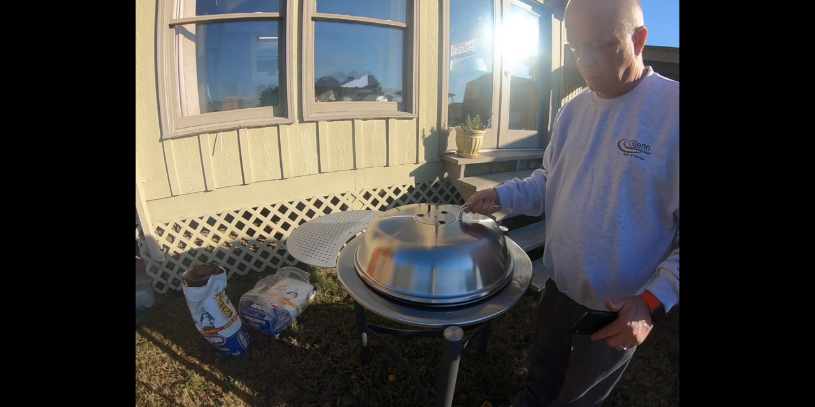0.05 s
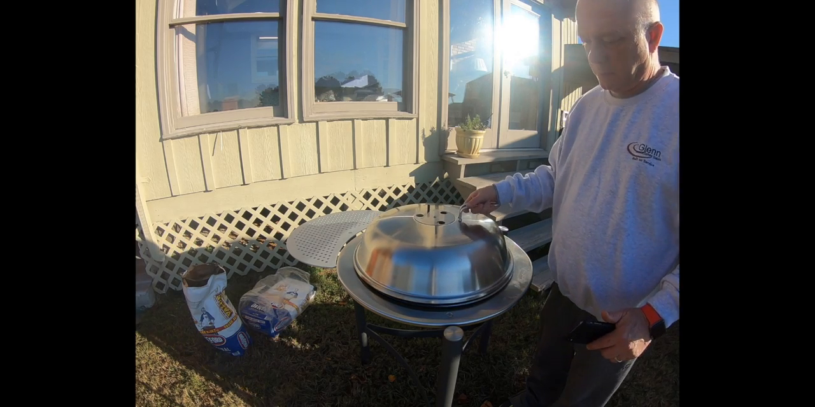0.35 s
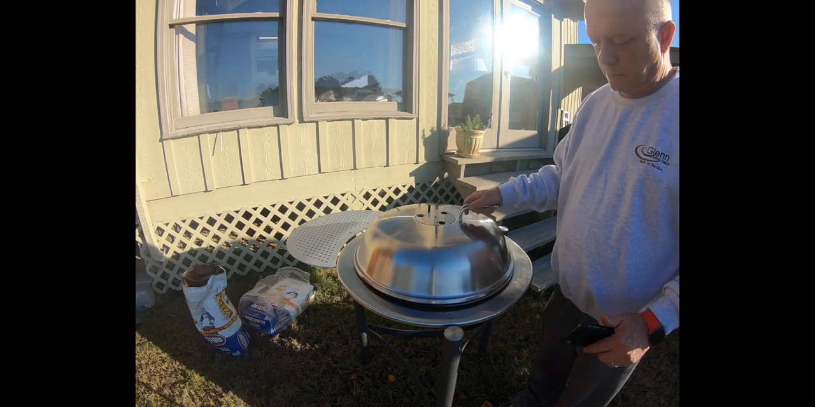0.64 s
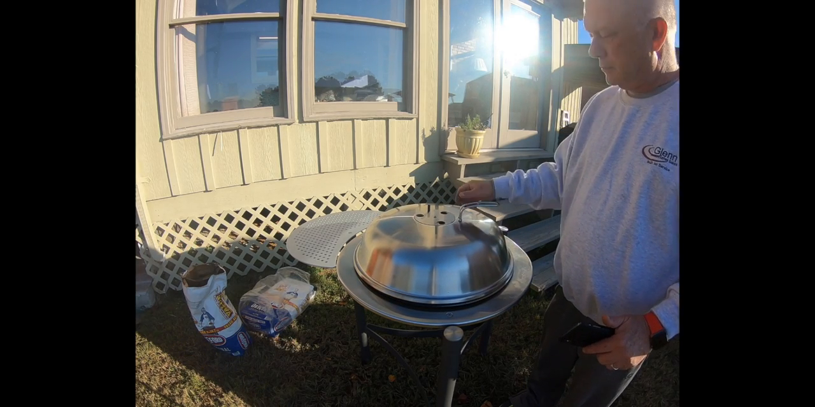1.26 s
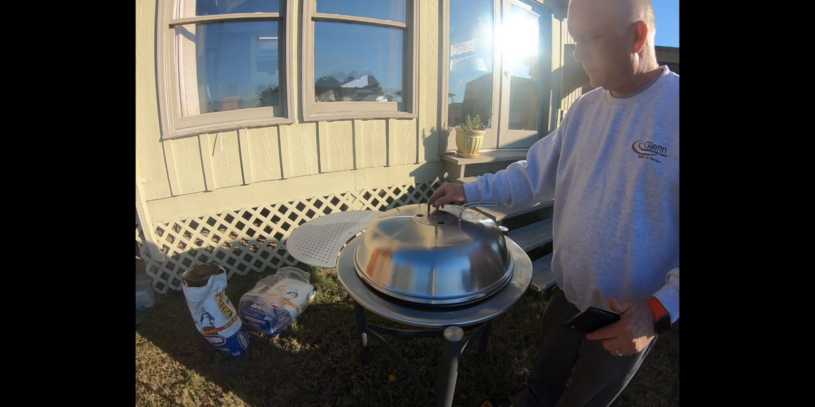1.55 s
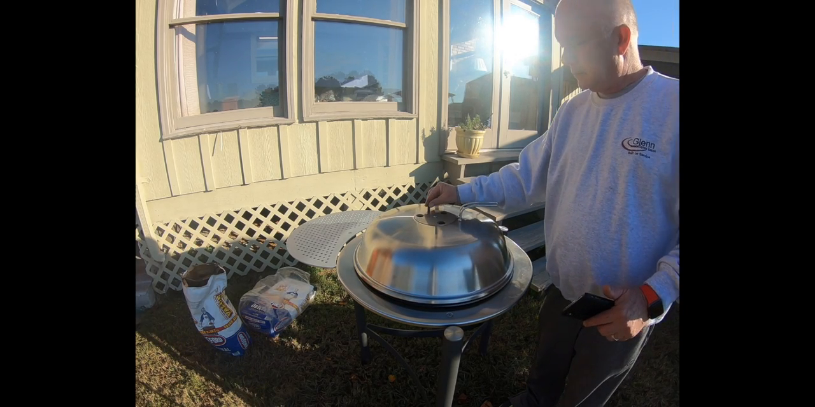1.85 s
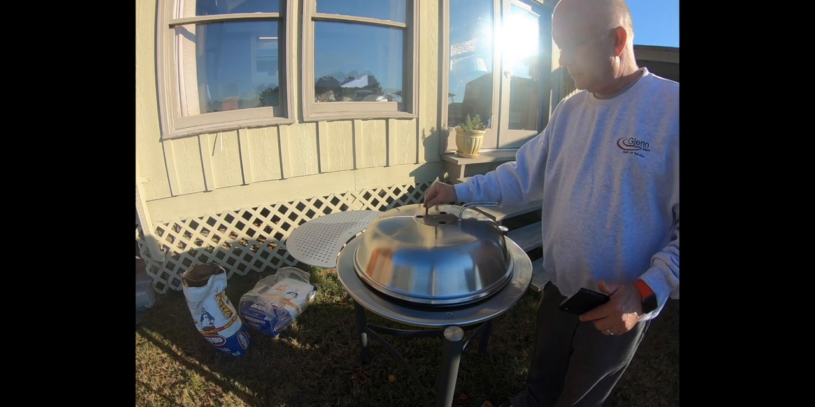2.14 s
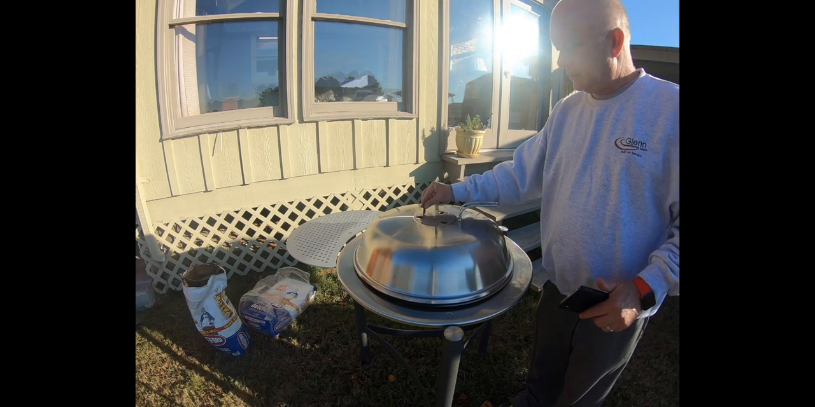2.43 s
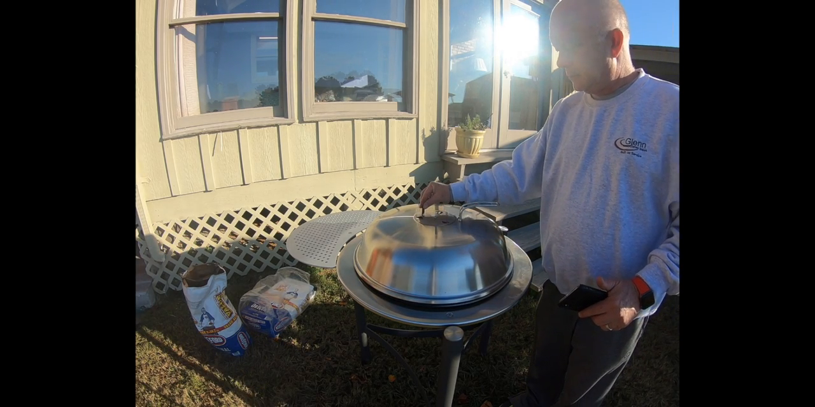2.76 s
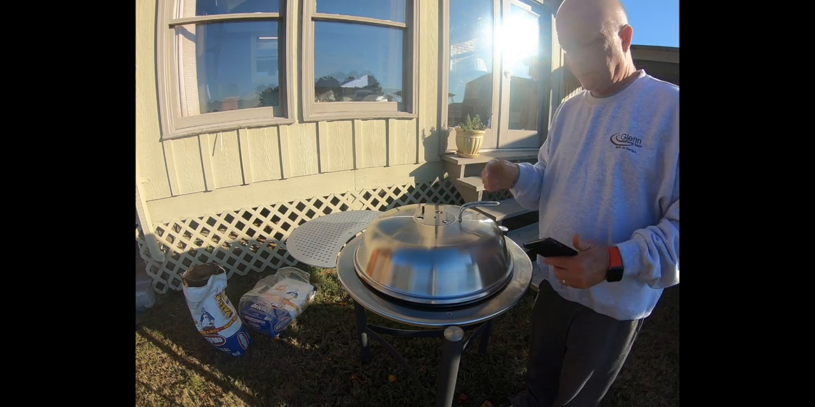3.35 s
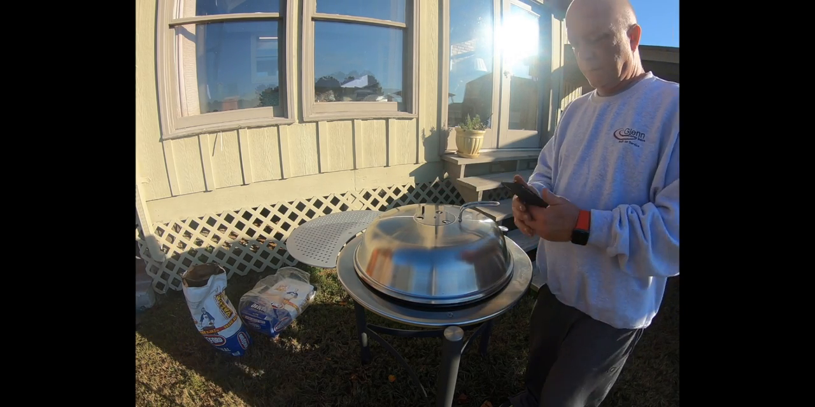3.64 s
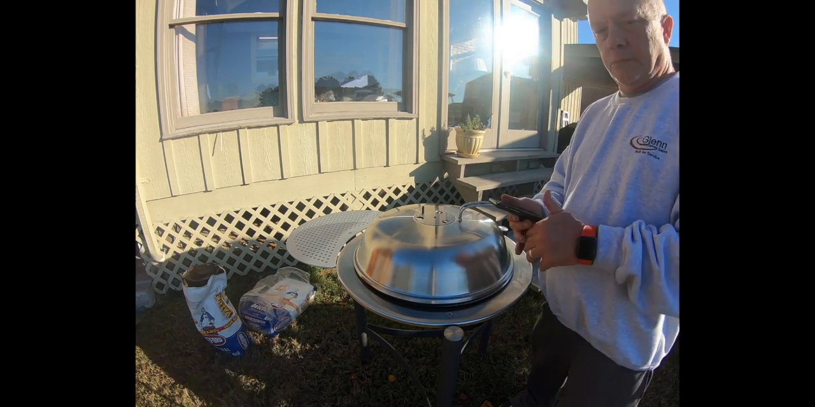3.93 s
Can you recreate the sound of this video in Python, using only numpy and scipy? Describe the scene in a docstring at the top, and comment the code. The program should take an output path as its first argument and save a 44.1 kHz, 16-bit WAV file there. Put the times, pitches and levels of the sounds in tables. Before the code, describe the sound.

Metal clacks and ticks from a grill lid, over low wind buffeting the microphone.

```python
"""Grill lid in a windy yard

A steel grill lid is handled: its fittings scrape, clack and tick, and the dome rings briefly.
A soft, hollow rub follows the last clack, then a sleeve swishes as the hand comes away, with a few
small clicks. The yard walls answer lid and hand. Wind buffets the microphone, harder after the
first second, with dull low bumps, over a faint outdoor hush."""
import sys
import numpy as np
from scipy import signal
from scipy.fft import rfft, irfft, next_fast_len
from scipy.io import wavfile
from scipy.ndimage import map_coordinates

SR = 44100
rng = np.random.default_rng(int(sys.argv[2]) if len(sys.argv) > 2 else 0)


def master_out(mix):
    """Clip the mix to full scale and print it as 16-bit PCM to the path in sys.argv[1]."""
    frames = np.transpose(np.atleast_2d(mix))
    ceiling = np.clip(frames, -1, 1)
    pcm = np.round(ceiling * 32767).astype(np.int16)
    wavfile.write(sys.argv[1], SR, pcm)


N = 176400
T = np.arange(N) / SR
LN_1000 = np.log(1000)  # a 60 dB decay


def amp(db):
    """Decibels to gain."""
    return 10 ** (np.asarray(db) / 20)


def unit(x):
    """Scale to rms 1."""
    return x / np.sqrt(np.mean(x ** 2) + 1e-20)


def along(points, hz):
    """Read a (freq_hz, value) curve on a log frequency axis."""
    freqs, values = np.transpose(points)
    return np.interp(np.log(hz + 1), np.log(freqs + 1), values)


def fader(points):
    """Gain per sample from (time_s, level_db) points."""
    return amp(np.interp(T, *np.transpose(points)))


def lowpass(x, cutoff_hz):
    """Roll off the highs at 24 dB an octave."""
    size = next_fast_len(N + SR // 2)
    hz = np.fft.rfftfreq(size, 1 / SR)
    return irfft(rfft(x, size) / (1 + (hz / cutoff_hz) ** 4), size)[:N]


def noise(*eqs):
    """Noise of rms 1 through stacked (freq_hz, gain_db) EQ curves."""
    hz = np.fft.rfftfreq(N, 1 / SR)
    response = amp(sum(along(eq, hz) for eq in eqs))
    return unit(irfft(rfft(rng.standard_normal(N)) * response, N))


def wobble(rate_hz):
    """A smooth curve through rate_hz random points a second."""
    return map_coordinates(rng.standard_normal(N // 8), [T * rate_hz], mode="wrap")


def strike(start_s, attack_s, t60_s):
    """Envelope of a hit: fast attack, exponential decay."""
    age = np.maximum(T - start_s, 0)
    return (1 - np.exp(-age / attack_s)) * np.exp(-np.minimum(LN_1000 * age / t60_s, 50))


# Hits on the lid: start_s, level_db, bass_db, presence_db, treble_db, attack_s, t60_s, ring_offset_db
LID_HITS = [(.018, -22, -23, -11, 3, 0.00033, 0.027, -35), (.053, -31.5, 14, 19, -6, 0.00073, 0.049, -23),
            (0.29, -35, 3, 1.5, -1, 0.00087, 0.096, -11), (.383, -20, 5.5, 0, 5.5, 0.00034, 0.13, -15.5),
            (0.393, -27, 6.5, 7, 1.5, .001, 0.21, -11.5), (.513, -45, -21, 8, 13, .002, .2, -12),
            (.648, -50, 13, -5, 11.5, 0.0025, 0.22, -17), (.775, -40, -2.5, -1.5, -10.5, .0015, 0.28, -13),
            (1.188, -36, -10.5, 4, -6, .002, 0.2, -8), (1.575, -47.5, -11, 7, -3.5, .001, 0.26, -9),
            (1.968, -51.5, -8, 0, 4, .001, 0.6, -1.5), (2.026, -19, -4, -8.5, -12.5, .001, 0.095, -13),
            (2.034, -23.5, -10, 2.5, 2.5, 0.00095, 0.17, -12)]
# EQ of the dense clatter: freq_hz, gain_db
CLATTER_EQ = [(80, -8.5), (200, 4), (450, -6.5), (700, -2), (1100, -4), (1800, -8), (3100, -7.5),
              (4800, -12.5), (6400, -12), (8500, -22), (13000, -24.5), (16000, -49.5)]
# Resonances of lid and bowl that colour the clatter: centre_hz, half_width_hz, gain_db
BODY_RESONANCES = [(233, 60, -2), (429, 7.3, 11.5), (588, 69, 6), (910, 49, 7), (1000, 30, 5.5),
                   (1217, 22, 11.5), (1550, 8.3, 5), (2260, 180, 2), (2950, 36, 1.5)]
# Ringing modes of the dome: pitch_hz, gain_db, t60_s
DOME_MODES = [(467, -7, .28), (571, -10, .22), (640, -9, .22), (803, -9, .3), (898, -6, .35),
              (1056, -6, .35), (1252, -5, .28), (1384, -10, .55), (1577, -9, .35), (2169, -15, .3),
              (2547, -11, .42), (3075, -14, .28), (3628, -10, .35), (5697, -14, .28)]


def lid_knocks(mode_spread_db=1.1):
    """Each knock on the steel is a short, dense clatter plus the ring of the dome's modes."""
    hz = np.geomspace(100, 4000, 400)
    peaks_db = sum(db / (1 + ((hz - centre) / width) ** 2) for centre, width, db in BODY_RESONANCES)
    body_eq = np.column_stack([hz, peaks_db])
    out = np.zeros(N + SR)
    age = np.arange(SR * 3 // 4) / SR
    for start_s, level_db, bass_db, presence_db, treble_db, attack_s, t60_s, ring_db in LID_HITS:
        hit_eq = [(300, bass_db), (1000, 0), (3000, presence_db), (9000, treble_db)]
        clatter = noise(CLATTER_EQ, body_eq, hit_eq)
        out[:N] += amp(level_db) * strike(start_s, attack_s, t60_s) * clatter
        ring = np.zeros(len(age))
        for pitch_hz, mode_db, mode_t60_s in DOME_MODES:
            decay = amp(mode_db + rng.normal(0, mode_spread_db)) * np.exp(-LN_1000 * age / mode_t60_s)
            ring += decay * np.sin(2 * np.pi * (pitch_hz * age + rng.random()))
        ring *= 1 - np.exp(-age / attack_s)
        out[round(start_s * SR):][:len(age)] += amp(level_db + ring_db) * ring
    return out[:N]


# Tick of the fittings: start_s, level_db, t60_s
FITTING_TICKS = [(2.004, -30, 0.15)]
# Its bright, peaky EQ: freq_hz, gain_db
TICK_EQ = [(500, -24), (1500, -3.5), (2600, -11), (3400, -13), (3650, 8), (3900, -11), (4600, -9),
           (5400, -8), (6100, -15), (6650, 3), (7500, -8.5), (8600, -20), (10000, -6.5), (11000, -9.5),
           (16000, -19)]


def fitting_tick(attack_s=0.00028):
    """A light first touch of metal just ahead of the last big clack."""
    return sum(amp(level_db) * strike(start_s, attack_s, t60_s) * noise(TICK_EQ)
               for start_s, level_db, t60_s in FITTING_TICKS)


# Slides of the fittings: start_s, length_s, level_db, bass_db
SCRAPE_STROKES = [(-.015, .072, -37, 3), (.298, .08, -40, -7)]
# EQ of sliding metal: freq_hz, gain_db
SCRAPE_EQ = [(100, -3), (330, 6.5), (600, 4), (1200, 0), (1900, -10), (3000, -5), (4500, -15),
             (6300, -14.5), (8500, -19.5), (15000, -22)]


def metal_scrapes(rough_db=3, attack_s=0.012, release_s=0.028):
    """Metal drags on metal with an uneven grip."""
    out = np.zeros(N)
    for start_s, length_s, level_db, bass_db in SCRAPE_STROKES:
        attack = np.clip((T - start_s) / attack_s, 0, 1)
        release = np.exp(-np.maximum(T - start_s - length_s, 0) / release_s)
        friction = noise(SCRAPE_EQ, [(300, bass_db), (800, 0)])
        grip = amp(rough_db * wobble(250))
        out += amp(level_db) * attack * release * unit(friction * grip)
    return out


# Swell of the rub after the last clack: time_s, level_db
RUB_FADER = [(2.08, -69), (2.17, -63), (2.23, -44.5), (2.31, -41.5), (2.38, -50.5), (2.5, -55), (2.65, -71)]
# Its hollow EQ: freq_hz, gain_db
RUB_EQ = [(300, -21), (520, -9), (640, 4.5), (800, 1.5), (930, -6), (1200, -2.5), (1500, -10.5),
          (1900, -23.5), (2500, -21.5), (4000, -37), (9000, -41.5)]


def lid_rub(rough_db=2):
    """A gentle slide sounds the lid's low resonances."""
    gate = (T > RUB_FADER[0][0]) & (T < RUB_FADER[-1][0])
    friction = noise(RUB_EQ) * amp(rough_db * wobble(65))
    return fader(RUB_FADER) * gate * unit(friction)


# Swell of the sleeve swish: time_s, relative_db
SLEEVE_FADER = [(3.46, -63.5), (3.54, -44.5), (3.6, -37), (3.645, -40), (3.7, -40.5), (3.73, -48),
                (3.81, -57), (3.87, -50.5), (4, -61.5)]
# Airy EQ of the cloth: freq_hz, gain_db
CLOTH_EQ = [(300, -22), (1100, -6.5), (2000, -14.5), (3200, -5), (4800, -8.5), (5800, -0.5), (6700, -0.5),
            (7700, -7.5), (11000, -10), (15500, -21)]


def sleeve_swish(grain_db=1.5, snag_db=3.15, gain_db=-3.5):
    """Grainy cloth friction swells, snags and fades."""
    gate = T > SLEEVE_FADER[0][0]
    grip = amp(grain_db * wobble(700) + snag_db * wobble(50))
    return amp(gain_db) * fader(SLEEVE_FADER) * gate * unit(noise(CLOTH_EQ) * grip)


# Small clicks in the hand: start_s, level_db, pitch_hz
HAND_CLICKS = [(3.619, -25, 6150), (3.639, -21.5, 6100), (3.6442, -19, 5650), (3.668, -31, 6500),
               (3.681, -28.5, 1200), (3.704, -31, 2360), (3.7895, -33, 4270), (3.842, -33, 6500)]


def hand_clicks(attack_s=0.00042, t60_s=0.0086, skirt_oct=0.52, skirt_db=-13):
    """Tiny dry clicks, each with one broad resonance."""
    out = np.zeros(N)
    ratio = 2 ** skirt_oct
    for start_s, level_db, pitch_hz in HAND_CLICKS:
        peak = [(pitch_hz / ratio, skirt_db), (pitch_hz, 0), (pitch_hz * ratio, skirt_db)]
        click_eq = [(150, -25), *peak, (16000, -30)]
        out += amp(level_db) * strike(start_s, attack_s, t60_s) * noise(click_eq)
    return out


def eddies(eq, evenness):
    """Low turbulence with its chance swells evened out: 0 leaves them, 1 nearly flattens them."""
    turbulence = noise(eq)
    power = np.abs(signal.hilbert(turbulence)) ** 2
    return unit(turbulence / (power + 0.3) ** (evenness / 2))


# Gusts of wind pressure and their faster eddies: time_s, relative_db
GUST_FADER = [(0, -21), (.2, -59), (.45, -29), (.53, -17), (.62, -30), (.75, -59), (.92, -25),
              (1.02, -21.5), (1.25, -9.5), (1.52, -15), (1.67, -6.5), (1.8, -20), (1.9, -21), (1.98, -10.5),
              (2.1, -12), (2.22, -8), (2.45, -16), (2.66, -14.5), (2.8, -25.5), (2.95, -12.5), (3.15, -19),
              (3.38, -23), (3.6, -11.5), (3.8, -15.5), (4, -19)]
FLUTTER_FADER = [(0.08, -40), (0.17, -63), (0.21, -40), (0.35, -57), (0.39, -38), (0.48, -53), (0.92, -55),
                 (1.08, -26.5), (1.41, -38.5), (1.47, -44), (1.72, -21), (1.75, -34.5), (1.99, -18),
                 (2.14, -25), (2.19, -16.5), (2.35, -28), (2.41, -51.5), (2.95, -52), (3.03, -72),
                 (3.22, -59), (3.47, -38), (3.56, -60), (3.7, -29), (3.97, -41)]
# EQs of the subsonic sway, sub-bass buffet and bass flutter: freq_hz, gain_db
SWAY_EQ = [(0, -48), (1.5, -7.5), (3, -3.5), (7, -2), (14, -8), (22, -14.5), (40, -62), (100, -120)]
BUFFET_EQ = [(0, -54), (8, -17), (18, 3), (28, 1.5), (45, -11), (65, -25), (100, -33.5), (200, -71.5),
             (500, -120)]
FLUTTER_EQ = [(30, -12), (60, 8.5), (80, 0.5), (120, -7.5), (180, -20.5), (280, -37.5), (500, -44.5),
              (1500, -87)]


def wind(sway_db=-10, buffet_db=0.5, flutter_db=2, sway_follows=0.23, ceiling=0.97):
    """Wind sways, buffets and flutters on the microphone; the largest pushes saturate softly."""
    gusts = fader(GUST_FADER)
    sway = amp(sway_db) * unit(gusts ** sway_follows) * eddies(SWAY_EQ, evenness=0.9)
    buffet = amp(buffet_db) * gusts * eddies(BUFFET_EQ, evenness=0.6)
    flutter = amp(flutter_db) * fader(FLUTTER_FADER) * eddies(FLUTTER_EQ, evenness=0.6)
    pressure = sway + buffet + flutter
    saturated = pressure / (1 + (pressure / ceiling) ** 6) ** (1 / 6)
    return signal.windows.tukey(N, 0.015) * saturated


# Soft bumps on the microphone: start_s, level_before_lowpass_db, t60_s, cutoff_hz
MIC_BUMPS = [(.217, -36.5, 0.094, 300), (0.385, -27, 0.09, 700), (1.075, -32, .12, 170),
             (1.275, -22, 0.046, 130), (1.698, -20, 0.059, 180), (1.799, -29.5, .12, 300),
             (1.846, -27.5, 0.074, 400), (2.122, -23, 0.075, 300), (2.289, -29, 0.17, 275),
             (3.704, -27, 0.057, 357)]
# Their bass-heavy EQ: freq_hz, gain_db
BUMP_EQ = [(40, -8), (90, -3.5), (160, -2.5), (230, -4.5), (350, -11), (600, -36.5), (2000, -86.5)]


def mic_bumps(attack_s=0.0013):
    """Brief, dull pushes of air and handling."""
    out = np.zeros(N)
    for start_s, level_db, t60_s, cutoff_hz in MIC_BUMPS:
        push = amp(level_db) * strike(start_s, attack_s, t60_s) * eddies(BUMP_EQ, evenness=0.87)
        out += lowpass(push, cutoff_hz)
    return out


# Decay of the yard's reverb: freq_hz, t60_s
YARD_DECAY = [(200, 0.6), (1200, 0.78), (3500, 0.7), (6500, 0.51), (9000, 0.1), (15000, 0.25)]


def yard_reverb(send, attack_s=0.004):
    """Walls around the yard answer; the treble dies first."""
    hz, age, spectrum = signal.stft(rng.standard_normal(SR), SR, nperseg=256)
    decay = np.exp(-LN_1000 * age / along(YARD_DECAY, hz)[:, None])
    tail = signal.istft(spectrum * decay, SR, nperseg=256)[1]
    tail *= 1 - np.exp(-np.arange(len(tail)) / SR / attack_s)
    return signal.fftconvolve(send, tail / np.linalg.norm(tail))[:N]


# EQ of the outdoor bed: freq_hz, gain_db
HUSH_EQ = [(120, -4), (200, -0.5), (352, -4), (423, -4), (455, -4), (786, -3.5), (1290, -12.5), (2070, -17),
           (2350, -19.5), (5960, -24.5), (15700, -30)]


def outdoor_hush(level_db=-54.5, drift_db=0.8):
    """Faint outdoor air, drifting slightly in level."""
    return amp(level_db + drift_db * wobble(2.6)) * noise(HUSH_EQ)


def scene(lid_send_db=-13.5, hand_send_db=-11.5):
    """Mono mix of lid and hand in the yard, under the wind."""
    lid = lid_knocks() + fitting_tick() + metal_scrapes() + lid_rub()
    hand = sleeve_swish() + hand_clicks()
    walls = yard_reverb(amp(lid_send_db) * lid + amp(hand_send_db) * hand)
    return (lid + hand + walls + wind() + mic_bumps() + outdoor_hush())[None]


def record(dry):
    """A steep high cut takes the very top off the mix."""
    high_cut = signal.ellip(10, 0.05, 60, 15820, fs=SR, output="sos")
    return signal.sosfiltfilt(high_cut, dry)


dry = scene()
out = record(dry)
master_out(out)
```